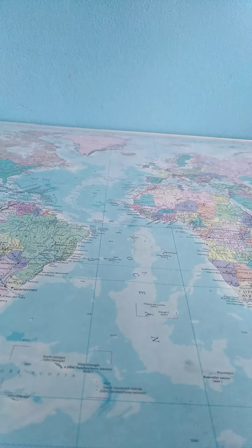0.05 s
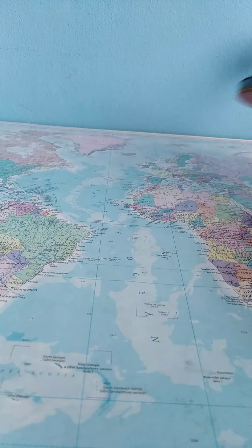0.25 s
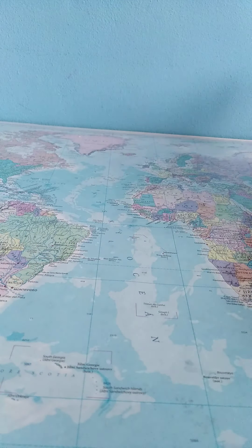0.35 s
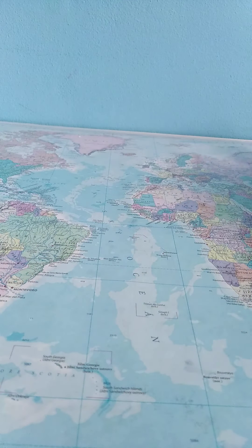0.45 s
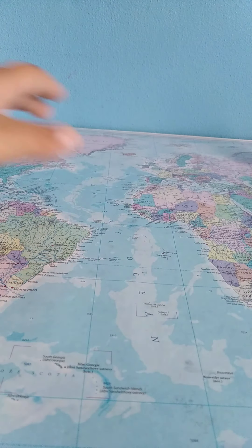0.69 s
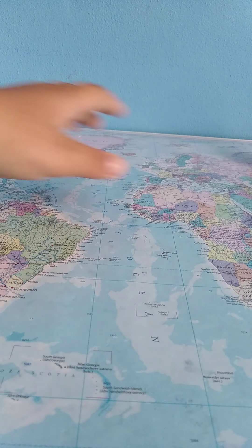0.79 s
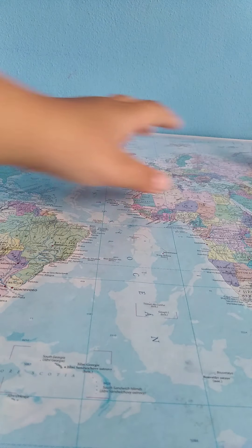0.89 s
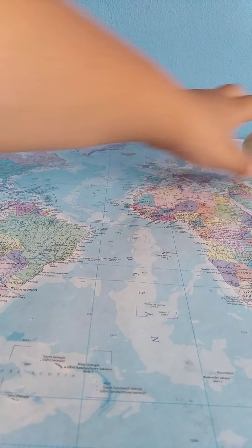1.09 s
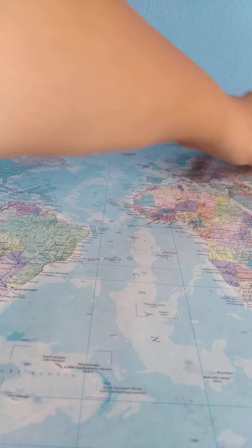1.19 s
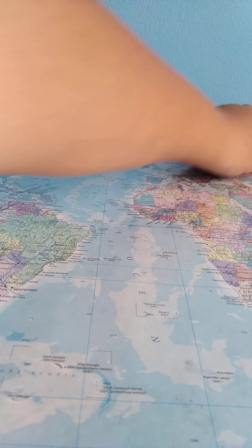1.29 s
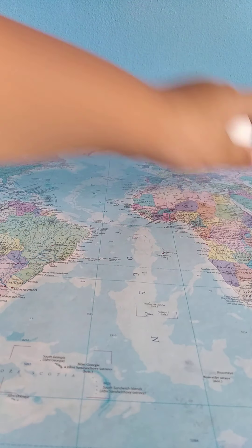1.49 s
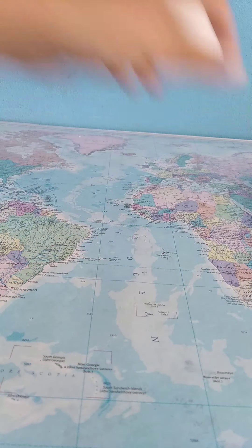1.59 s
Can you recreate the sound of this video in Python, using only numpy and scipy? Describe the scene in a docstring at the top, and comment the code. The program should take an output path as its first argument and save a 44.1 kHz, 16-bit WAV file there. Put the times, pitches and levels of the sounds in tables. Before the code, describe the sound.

A table tennis ball cracks on a tabletop at 0.2 seconds and a rubber paddle hits it at 0.5, both ringing briefly with a low boom in a small bare room. A light tick and dull knock follow at 0.6. From about 1 second, faint cloth rustle grows while a hand softly rubs and bumps the table, taking the ball with a tiny tap at 1.6.

```python
"""A table tennis ball bounces on a tabletop, then a rubber paddle strikes it. Both hits echo off a wall
and ring in a small bare room, with a boom near 200 Hz. Next the ball glances off something with a light
double tick and a dull knock. Then an arm reaches across the table: cloth, faint from the start, rustles
louder, the hand rubs and bumps the top softly, and at last it takes the ball."""
import sys
import numpy as np
from scipy import signal
from scipy.fft import rfft, irfft, next_fast_len
from scipy.io import wavfile

SR = 44100
rng = np.random.default_rng(int(sys.argv[2]) if len(sys.argv) > 2 else 0)


def wav_out(sig):
    """Save sig, one row per channel (or a flat mono array), as 16-bit PCM at SR to the path in sys.argv[1]."""
    wavfile.write(sys.argv[1], SR, np.round(np.clip(np.atleast_2d(sig).T, -1, 1) * 32767).astype(np.int16))


N = 72765
T = np.arange(N) / SR
BOUNCE_S, STROKE_S, KNOCK_S, GRAB_S = .2118, .4799, .582, 1.5987
CRACK_RISE_S, CRACK_FADE_S = 0.000458, 0.0102   # a fade time is how long a sound takes to drop 60 dB
CRACK_LEAD_S = 0.000621   # the crack comes just before the table or paddle rings
# tone colour of the crack of a hard hit: (pitch [Hz], level [dB])
CRACK_COLOUR = [(150, -18), (500, 12.5), (1500, -6), (3300, -2.5), (4800, -17), (7000, -14.5), (8800, -15),
                (11000, -6), (14000, -27.5), (16000, -43.5)]


def bounce():
    """The ball lands with a crack and makes the tabletop ring."""
    # the tabletop's tones: (pitch [Hz], level [dB], fade time [s])
    table_tones = [(287, -11, 0.018), (442.2, 0.5, 0.0222), (607, -0.5, 0.0075), (803.6, -8, 0.0359),
                   (1060, -9, 0.0068), (1665, -4.5, 0.0107), (2100, -15, 0.0032), (2855, -5, 0.0143),
                   (3618, 0.5, 0.00553)]
    tabletop = ring(table_tones, BOUNCE_S, db=-9, pan_db=0, lag_s=0.0000946)
    return tabletop + crack(BOUNCE_S - CRACK_LEAD_S, CRACK_COLOUR, CRACK_FADE_S, db=-7)


def stroke():
    """The paddle hits the ball with a crack and rings briefly."""
    # the paddle's tones: (pitch [Hz], level [dB], fade time [s])
    paddle_tones = [(290.4, -4.5, 0.0095), (386.7, -2, 0.0253), (671, -17, 0.02), (890, -18.5, 0.042),
                    (1509, -3, 0.0134), (1754, -2.5, 0.0089), (2747, -6.5, 0.0079), (3355, -11.5, 0.0061)]
    paddle = ring(paddle_tones, STROKE_S, db=-6.5, pan_db=3.96, lag_s=0.000123)
    return paddle + crack(STROKE_S - CRACK_LEAD_S, CRACK_COLOUR, CRACK_FADE_S, db=-12.5) * pan(db=-1.5)


def ball_clicks():
    """The ball's thin shell clicks twice each at the bounce, the stroke and the glancing touch."""
    # the shell's tones: (pitch [Hz], level [dB], fade time [s])
    shell_tones = [(5900, -18, .005), (8450, -9, .005), (8900, -5, .008), (10100, -9, .005),
                   (11400, -10, .004), (13300, -10, .004)]
    # when the shell clicks: (time [s])
    click_times = [.2101, .2113, .4793, .4805, .5817, .5843]
    # each of those clicks: (level [dB], left over right [dB], left side's delay [s])
    clicks = [(-13, 1, 0.00083), (-8, -6.5, 0.000093), (-26, -3.5, 0.0024), (-11, 6, 0), (-26, 3, .00002),
              (-27.5, 0.5, 0.0022)]
    return sum(ring(shell_tones, s, *click) for s, click in zip(click_times, clicks))


def double_tick():
    """The ball glances off something with two light, bright cracks."""
    # the two ticks: (time [s], level [dB])
    ticks = [(.5815, -24), (.5840, -25)]
    # their tone colour: (pitch [Hz], level [dB])
    tick_colour = [(200, 13), (1000, 1), (1900, -3.5), (3500, -8.5), (4500, -1), (5300, -16.5), (7000, -16),
                   (8100, 8), (10000, -1), (12000, -6), (14000, -22.5), (15500, -25.5)]
    return sum(crack(s - CRACK_RISE_S, tick_colour, fade_s=0.011, db=db) for s, db in ticks) * pan(db=3.5)


def knock():
    """A dull knock comes with the ticks and booms low in the room."""
    # its tones: (pitch [Hz], level [dB], fade time [s])
    knock_tones = [(92.4, -12, 0.098), (114.36, -3, 0.3864), (137.3, 0, 0.176), (195.86, 3, 0.352),
                   (294, -9.5, 0.154)]
    return ring(knock_tones, KNOCK_S, db=-35, pan_db=7) * swell(KNOCK_S, rise_s=0.0045)


def wall_echo(direct, delay_s=.009):
    """The near wall sends the sound back later, quieter and without its low notes."""
    delayed = np.array([np.interp(T - delay_s, T, side) for side in direct])
    return from_db(-11.5) * band(delayed + 1e-18, hz=1540, kind="high")


def room():
    """The room answers the bounce and the stroke, each with a wash of echoes and a boom."""
    # tone colour of the echoes after each hit: (pitch [Hz], level [dB])
    bounce_colour = [(60, -33.5), (110, -27), (160, -19), (195, -9.5), (245, -6), (420, -6.5), (680, -11),
                     (900, -11), (1300, -21.5), (2000, -19.5), (3000, -20.5), (4000, -25.5), (4900, -39.5),
                     (7000, -39), (8900, -26), (12000, -35.5), (14000, -50.5), (15000, -71)]
    stroke_colour = [(60, -36), (120, -15.5), (195, -8), (260, -6.5), (480, -13.5), (700, -17),
                     (900, -16.5), (1150, -20.5), (1900, -10), (2400, -17.5), (3000, -21), (4000, -27),
                     (4900, -42.5), (7000, -48), (8900, -27.5), (12000, -32), (14000, -41), (15000, -78.5)]
    return (reverberation(BOUNCE_S, bounce_colour, db=-28, pan_db=1.5, rise_s=0.0043, hold_s=0.0616)
            + boom(BOUNCE_S, db=-23.5, pan_db=2.5)
            + reverberation(STROKE_S, stroke_colour, db=-27.5, pan_db=5, rise_s=0.0012, hold_s=0.0177)
            + boom(STROKE_S, db=-26.5, pan_db=5.5))


def reverberation(s, colour, db, pan_db, rise_s, hold_s):
    """Many echoes blur into noise that builds up, holds briefly, then dies at each octave's own rate."""
    # how long the room rings: (pitch [Hz], fade time [s])
    room_fades = [(100, 0.534), (300, 0.392), (700, 0.486), (2000, 0.384), (4000, 0.398), (10000, 0.416)]
    spectrum = rfft(noise(colour))
    octave = np.log2(np.clip(np.arange(spectrum.shape[1]) * SR / N, 64, 16384))
    wash = 0
    for k in range(6, 15):
        one_octave = irfft(spectrum * np.maximum(1 - abs(octave - k), 0), N)
        wash += one_octave * fade(age(s + hold_s), at_hz(room_fades, 2. ** k))
    return from_db(db) * pan(pan_db) * swell(s, rise_s) * wash


def boom(s, db, pan_db):
    """Sound trapped between the walls swells after a hit and rings on at the room's own pitches."""
    # the room's tones: (pitch [Hz], level [dB], fade time [s])
    room_tones = [(115.03, -17, 0.255), (202.06, 4.5, 0.341), (239.9, -9.5, 0.486), (308.6, -7, 0.474),
                  (412, -6.5, 0.439), (497.2, -7, 0.338), (565.5, -33.5, 0.26), (629.8, -9, 0.23),
                  (703.7, -6, 0.103), (1904.5, -22.5, 0.417), (1957, -20, 0.265)]
    return ring(room_tones, s, db, pan_db) * swell(s, rise_s=0.01463)


def cloth_rustle():
    """Cloth slides as the arm moves, making a low rustle and a high hiss."""
    # loudness of the cloth: (time [s], rustle level [dB], hiss level [dB])
    levels = [(0, -67.5, -63), (.11, -64, -63.5), (.17, -68, -65), (.45, -60.5, -62), (.74, -64, -56.5),
              (.89, -62.5, -67), (.97, -56.5, -58), (1.055, -61, -64.5), (1.1, -56, -59),
              (1.14, -52.5, -52), (1.22, -54, -50), (1.309, -54, -47), (1.335, -62.5, -57.5),
              (1.4, -68.5, -52.5), (1.47, -62, -55), (1.57, -54, -50), (1.65, -54, -49)]
    # where it is heard: (time [s], rustle left over right [dB], hiss left over right [dB])
    places = [(0, 18, 19), (.17, 22.5, 17.5), (.75, 14, 4), (.98, 11.5, 8.5), (1.2, 13.5, 6),
              (1.33, 8.5, 1), (1.65, 11.5, -2)]
    # tone colour of each part: (pitch [Hz], level [dB])
    rustle_colour = [(60, -13), (150, 0), (380, 0.5), (600, -4), (900, -7), (1300, -5), (1750, -9),
                     (2600, -7.5), (4100, -11.5), (4900, -19), (6500, -27), (9000, -83)]
    hiss_colour = [(2940, -52), (5000, -24.5), (7300, -11.5), (8500, 0), (10100, 1), (13700, -5.5),
                   (14700, -25), (14900, -68.5), (15500, -61.5)]
    rustle_db, hiss_db = over_time(levels)
    rustle_pan, hiss_pan = over_time(places)
    rustle = from_db(rustle_db) * noise(rustle_colour) * pan(rustle_pan)
    hiss = from_db(hiss_db) * noise(hiss_colour) * pan(hiss_pan)
    return rustle + hiss


def hand_rubs():
    """The hand scuffs the tabletop, and each rub is a smooth swell of noise."""
    # the rubs: (middle time [s], length [s], level [dB], lowest pitch [Hz], highest pitch [Hz])
    rubs = [(0.054, 0.148, -57.5, 88.4, 430), (1.08, 0.0199, -45.5, 152, 3060),
            (1.195, 0.141, -53.5, 109, 493), (1.271, 0.133, -57.5, 110, 490),
            (1.609, 0.305, -54, 2180, 3834)]
    # tone colour of rubbing: (pitch [Hz], level [dB])
    rub_colour = [(75, 0.5), (5000, -17)]
    sound = 0
    for s, length_s, db, low_hz, high_hz in rubs:
        friction = band(noise(rub_colour), [low_hz, high_hz], "band")
        rise_and_fall = np.exp(-(2 * (T - s) / length_s) ** 2)
        sound += from_db(db) * rise_and_fall * friction / friction.std()
    return sound


def hand_bumps():
    """The soft hand bumps the table and stirs only its low tones."""
    # the bumps: (time [s], level [dB], left over right [dB])
    bumps = [(0.867, -56, 17), (1.063, -42.5, -13.5), (1.075, -44, 0), (1.152, -47, -28.5),
             (1.171, -45, -26.5), (1.199, -35, -12), (1.253, -41, -17), (1.305, -44.5, -5.5),
             (1.351, -55.5, -22.5)]
    # the table's low tones: (pitch [Hz], level [dB], fade time [s])
    bump_tones = [(91.9, -6.5, 0.1416), (133.3, -3.5, 0.0625), (196.1, -5, 0.064), (270.3, -7.5, 0.0567),
                  (478, -10.5, 0.037)]
    return sum(ring(bump_tones, *bump) for bump in bumps)


def grab():
    """The ball meets the fingers with a small tap."""
    # the tap's tones: (pitch [Hz], level [dB], fade time [s])
    grab_tones = [(330, -2.5, .03), (620, -8, 0.0115), (1020, -5, 0.0307), (2200, 3.5, .004)]
    return ring(grab_tones, GRAB_S, db=-38.5, pan_db=9)


def background():
    """The faint, steady noise of the room."""
    # its tone colour: (pitch [Hz], level [dB])
    background_colour = [(18, -43.5), (30, 2.5), (296, -4), (485, -3), (552, -2.5), (815, -4.5),
                         (3980, -11), (5880, -25.5), (10400, -9), (13900, -21.5), (15000, -72)]
    return from_db(-61) * noise(background_colour)


def ring(tones, s, db, pan_db, lag_s=0):
    """Something struck at time s rings with fading pure tones, heard lag_s later on the left."""
    t = np.array([age(s + lag_s), age(s)])
    ringing = sum((-1) ** k * from_db(level) * fade(t, fade_s) * np.sin(2 * np.pi * hz * t)
                  for k, (hz, level, fade_s) in enumerate(tones))   # every second tone is flipped
    return from_db(db) * pan(pan_db) * ringing


def crack(s, colour, fade_s, db):
    """A few milliseconds of noise as two hard things touch."""
    start_s = s - CRACK_RISE_S
    return from_db(db) * noise(colour) * swell(start_s, CRACK_RISE_S) * fade(age(start_s), fade_s)


def noise(colour):
    """Stereo noise with the given tone colour, always scaled to the same overall strength."""
    # how alike the two sides are: (pitch [Hz], likeness [-1 opposite to 1 same])
    likeness = [(60, -0.062), (250, 0.564), (600, 0.754), (1200, -0.487), (3000, 0.135), (10000, -0.05)]
    size = next_fast_len(N)
    hz = np.maximum(np.arange(size // 2 + 1) * SR / size, 1)
    shared, opposed = rfft(rng.standard_normal((2, size)))
    alike = np.clip(at_hz(likeness, hz), -1, 1)
    spectrum = np.sqrt(1 + alike) * shared + np.sqrt(1 - alike) * opposed * [[1], [-1]]
    x = irfft(from_db(at_hz(colour, hz)) * spectrum, size)[:, :N]
    return x / x.std()


def from_db(db):
    """Turn decibels into a number to multiply by."""
    return 10 ** (np.asarray(db) / 20)


def at_hz(points, hz):
    """Read a table at any pitch, gliding between its rows octave by octave."""
    pitches, values = np.transpose(points)
    return np.interp(np.log(hz), np.log(pitches), values)


def over_time(points):
    """Join a table's rows with straight lines, giving one curve for each column after the time."""
    times, *columns = np.transpose(points)
    return [np.interp(T, times, column) for column in columns]


def pan(db):
    """Left and right volumes, with the left louder by db."""
    return from_db(np.array([[1], [-1]]) * db / 2)


def age(s):
    """Seconds since time s, zero before it."""
    return np.maximum(T - s, 0)


def swell(s, rise_s):
    """Grow from 0 towards 1, starting at time s."""
    return 1 - np.exp(-age(s) / rise_s)


def fade(t, fade_s):
    """Die away by 60 dB every fade_s seconds."""
    return from_db(-60 * t / fade_s)


def band(x, hz, kind):
    """A gentle filter: "high" keeps what is above hz, "band" what is between two pitches."""
    return signal.sosfilt(signal.butter(2, hz, kind, fs=SR, output="sos"), x)


def scene():
    """The ball, the room's answer and the reaching arm, over faint background noise."""
    hits = bounce() + stroke() + ball_clicks()
    ball = hits + double_tick() + knock()
    echoes = wall_echo(hits) + room()
    arm = cloth_rustle() + hand_rubs() + hand_bumps() + grab()
    return ball + echoes + arm + background()


def record(dry):
    """Thin the deep bass, round off the highest peaks and cut the very top of the treble."""
    ceiling, top_hz = .8, 15300
    thinned = band(dry, hz=72.3, kind="high")
    rounded = thinned / (1 + (thinned / ceiling) ** 4) ** .25
    return signal.sosfilt(signal.ellip(10, .2, 80, top_hz, fs=SR, output="sos"), rounded)


dry = scene()
out = record(dry)
wav_out(out)
```